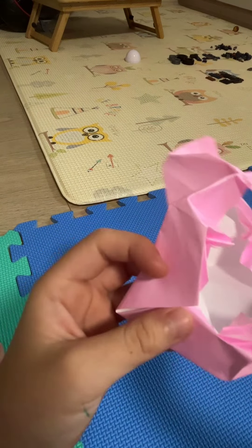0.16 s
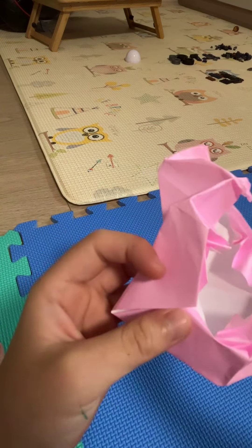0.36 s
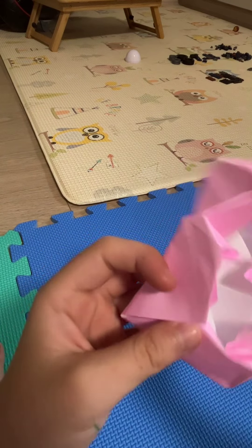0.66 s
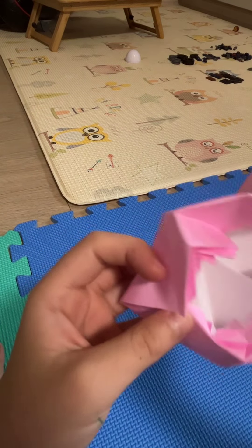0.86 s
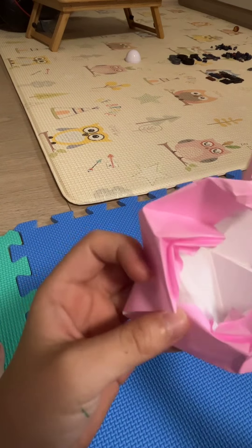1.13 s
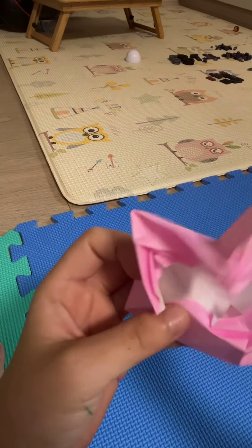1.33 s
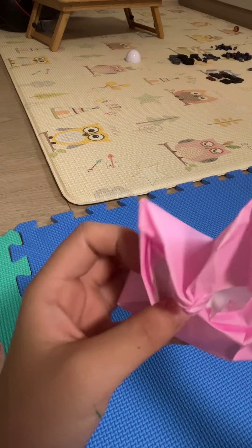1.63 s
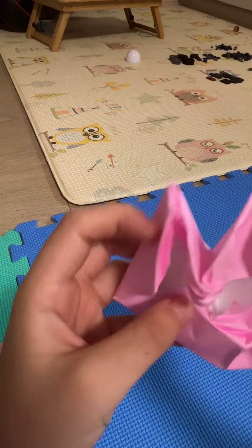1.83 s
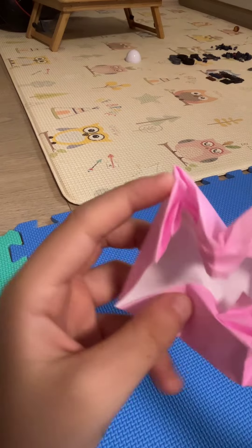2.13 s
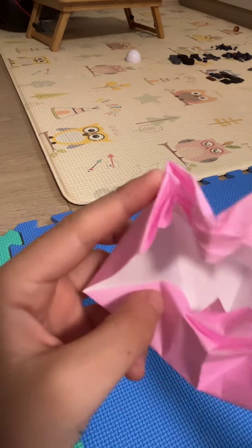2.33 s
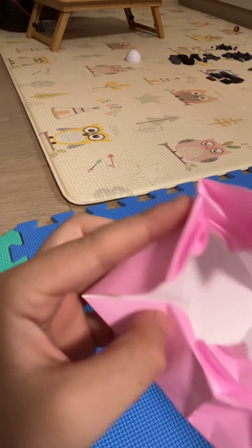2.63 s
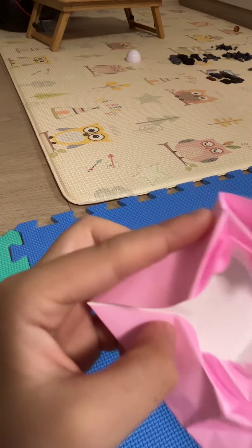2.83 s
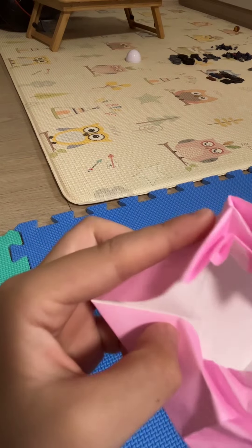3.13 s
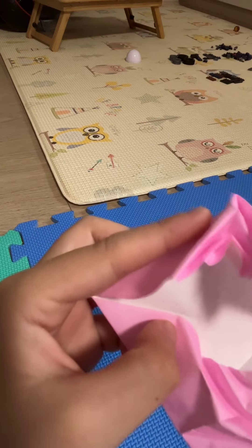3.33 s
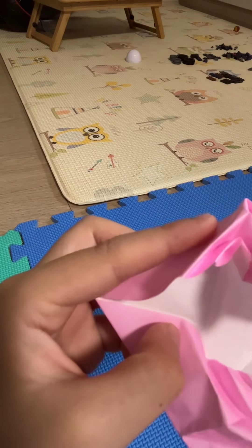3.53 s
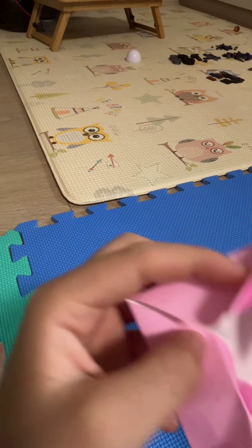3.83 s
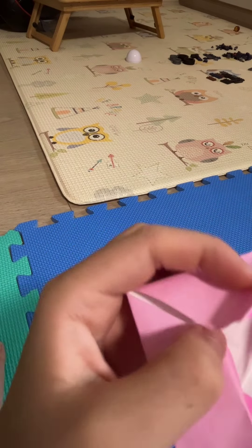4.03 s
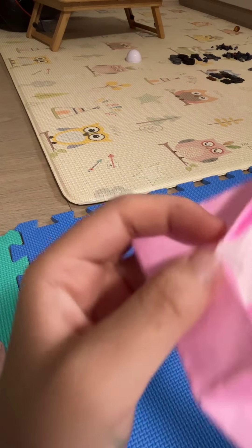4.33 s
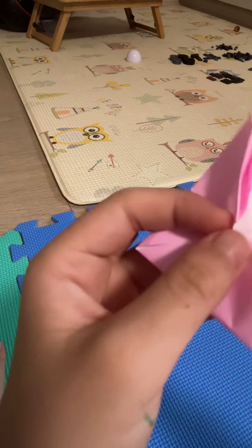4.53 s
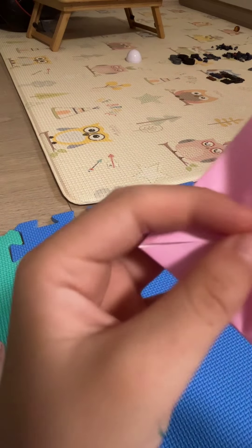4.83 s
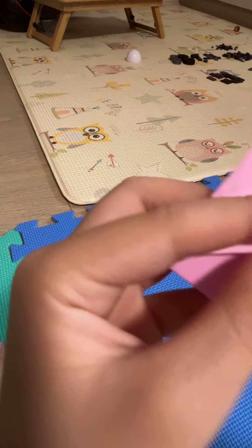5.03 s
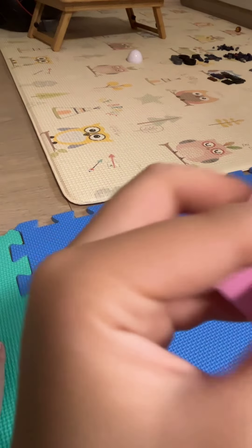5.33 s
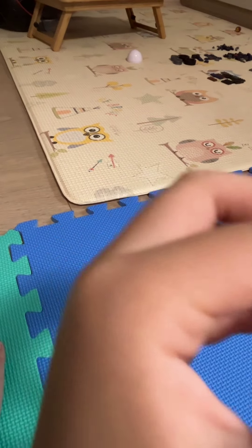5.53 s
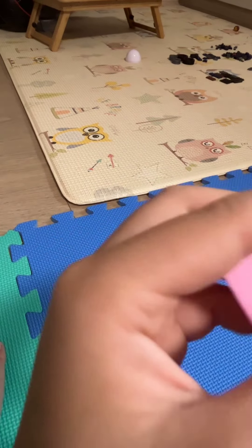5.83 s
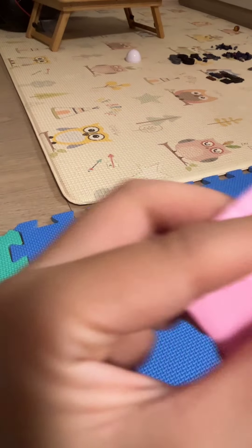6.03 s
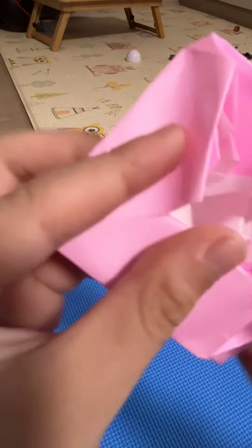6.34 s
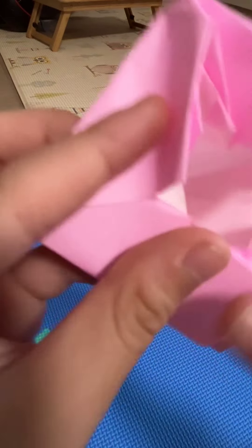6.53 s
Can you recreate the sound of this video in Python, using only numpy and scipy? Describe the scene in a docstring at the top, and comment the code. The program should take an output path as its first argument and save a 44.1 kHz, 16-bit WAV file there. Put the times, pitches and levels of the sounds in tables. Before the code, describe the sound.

Fingers flex and turn folded paper, giving irregular crackles, papery swishes and dull little thumps in a quiet indoor room.

```python
"""A low room hum and a soft rumble come first, with a faint paper rustle; then fingers fold a paper figure.
Hum, rumble and grip are coloured noise; the grip adds small ringing knocks.
Rustle is patchy hiss plus fibre clicks, shaped by a list of finger strokes.
Creases snap as short noise bursts in four bands; panels flap as short ringing tones that sag in pitch.
A faint room reply follows the paper, and the microphone trims both ends of the spectrum."""
import sys
import numpy as np
from scipy import signal
from scipy.fft import rfft, irfft, next_fast_len
from scipy.io import wavfile
from scipy.ndimage import uniform_filter1d, map_coordinates

SR = 44100
rng = np.random.default_rng(int(sys.argv[2]) if len(sys.argv) > 2 else 0)


def int16_out(signal):
    """Quantize to a 16-bit WAV file."""
    q = np.round(np.clip(np.atleast_2d(signal).T, -1, 1) * 32767)
    wavfile.write(sys.argv[1], SR, q.astype(np.int16))


N = 294134

# Spectral shape of the room hum: (frequency [Hz], relative level [dB])
HUM_SPECTRUM = [(59, -2.5), (100, -0.5), (547, -13), (1060, -22), (1760, -34), (10700, -44)]
# How the hands move, before stroke activity and wobble: (time [s], grip level [dB], rumble level [dB])
HAND_LEVELS = [(0, -72.5, -56.5), (1.4, -56, -59.5), (2.9, -54, -57), (3.4, -53.5, -51.5),
               (4.1, -56.5, -47.5), (4.6, -58.5, -63), (6.2, -67, -55), (6.67, -51, -68)]
# Spectral shape of the grip's flexing and bumping: (frequency [Hz], relative level [dB])
GRIP_SPECTRUM = [(60, 0), (150, -2), (500, -6), (2500, -32.5)]
# Spectral shape of the low rumble: (frequency [Hz], relative level [dB])
RUMBLE_SPECTRUM = [(22, -42), (50, 3), (110, -0.5), (200, -71)]
# Fingers sliding along paper: (time of full level [s], length [s], rustle level [dB])
STROKES = [(.01, 0.045, -54.5), (0.202, 0.12, -54.5), (0.661, 0.087, -45), (0.901, 0.13, -49.5),
           (1.198, 0.056, -56.5), (1.465, 0.071, -52.5), (1.542, 0.14, -55), (1.745, 0.2, -58),
           (1.852, 0.66, -51), (2.093, 0.23, -49), (2.485, 0.15, -46.5), (2.706, 0.28, -48.5),
           (3.038, 0.22, -54.5), (3.44, 0.068, -52), (3.559, 0.039, -45), (3.772, 0.13, -48.5),
           (3.91, 0.15, -46.5), (4.087, 0.077, -39), (4.249, 0.15, -47), (4.421, 0.15, -46.5),
           (4.776, 0.29, -51.5), (4.907, 0.15, -45), (5.123, .09, -56.5), (5.34, 0.21, -52),
           (5.453, 0.044, -43), (5.49, 0.27, -50.5), (5.834, 0.04, -43), (5.88, 0.15, -51.5),
           (5.982, 0.031, -36.5), (6.098, 0.11, -44), (6.267, 0.084, -50.5), (6.392, 0.15, -47.5),
           (6.507, 0.13, -51.5)]
# Spectral shape of skin on paper: (frequency [Hz], relative level [dB])
RUSTLE_SPECTRUM = [(500, -51), (1000, 1), (2500, -4), (5200, -3), (7000, -5), (9000, -6.5), (16000, -12)]
# Creases buckling: (time [s], level before band weighting [dB], brightest frequency [Hz])
CREASES = [(0.1515, -37.5, 6770), (0.2648, -32.5, 7700), (0.472, -41, 1950), (0.486, -40, 2830),
           (0.6758, -17.5, 4300), (0.8047, -38.5, 1350), (0.9025, -26, 5230), (1.1925, -42.5, 5570),
           (1.341, -36, 1190), (1.4238, -41.5, 5000), (1.4546, -33.5, 5000), (1.4616, -24.5, 4500),
           (1.4683, -19.5, 4400), (1.5521, -33, 5800), (1.56, -28.5, 1950), (1.5898, -39, 5840),
           (1.6184, -36, 4400), (1.6558, -35, 6930), (1.6738, -28, 5100), (1.703, -43.5, 5100),
           (2.1118, -24.5, 3370), (2.1568, -32.5, 7500), (2.284, -22.5, 3630), (2.3365, -40, 1770),
           (2.4877, -26.5, 1900), (2.5137, -34, 6700.0), (2.5331, -38, 5960), (2.594, -34, 3000),
           (2.606, -29, 4300), (2.6312, -44, 6400), (2.684, -44, 5370), (2.7941, -27, 2620),
           (2.8737, -30, 3120), (2.894, -30, 3320), (3.0362, -30.5, 1370), (3.302, -36.5, 1580),
           (3.3165, -30, 2700), (3.448, -26.0, 6940), (3.4827, -30, 2670), (3.502, -33.5, 3980),
           (3.565, -27, 5730), (3.5893, -22.5, 7000), (3.5956, -30, 6400), (3.747, -39, 4010),
           (3.8513, -26, 3030), (3.899, -26, 4370), (3.9187, -31, 6700), (3.9948, -33.5, 1630),
           (4.1108, -28, 4160), (4.1296, -27.5, 4300), (4.1391, -21.5, 2820), (4.236, -35.5, 6650),
           (4.257, -37.5, 7600), (4.341, -33.5, 6600), (4.358, -31.5, 5900), (4.655, -27.5, 3870),
           (4.824, -33.5, 6840), (4.843, -32, 6200), (4.948, -26.5, 3100), (4.9533, -21, 4000),
           (4.9984, -14.5, 7350), (5.037, -55.5, 2700), (5.052, -25.5, 2800), (5.1128, -37, 1700.0),
           (5.181, -31, 6200), (5.318, -21, 5040), (5.3831, -28, 3800), (5.527, -27.5, 4050),
           (5.6014, -35.5, 5300), (5.655, -34.5, 1490), (5.6942, -39.5, 5070), (5.738, -38.5, 7100),
           (5.84, -30, 7200), (5.851, -24, 3300), (5.9934, -28, 8140), (6.1216, -23.5, 3630),
           (6.169, -26.5, 4460), (6.2568, -32, 1300), (6.303, -28.5, 2550), (6.5216, -18, 5300),
           (6.616, -32, 2670)]
# Body, panel, crack and edge of a snap: (centre [Hz], width of one filter pass [Hz], decay by 60 dB [s])
SNAP_BANDS = [(644, 3830, 0.033), (2044, 3780, 0.0087), (5430, 5330, 0.0068), (10350, 7300, 0.0027)]
# Panels flipping over: (time [s], level before the 5 dB lift [dB], pitch before drop and sag [Hz])
PANEL_FLIPS = [(0.486, -40.5, 610), (0.905, -41, 664), (1.374, -42, 482), (1.466, -28.5, 328),
               (1.56, -30, 522), (1.859, -34.5, 370), (2.177, -33.5, 184), (2.338, -32.5, 520),
               (2.597, -33, 307), (2.895, -28.5, 444), (2.965, -36, 343), (3.038, -25, 168),
               (3.08, -38.5, 405), (3.316, -34, 670), (3.449, -35.5, 150), (3.483, -32, 578),
               (3.567, -39, 330), (3.592, -28.5, 345), (4.001, -29.5, 358), (4.143, -33.5, 137),
               (4.658, -34, 330), (4.95, -29.5, 420), (5.051, -24.5, 273), (5.071, -31, 227.7),
               (5.115, -32.5, 255), (5.385, -28, 242), (5.464, -38, 196), (6.123, -30, 448),
               (6.523, -29.5, 459), (6.615, -37.5, 198)]
# How fast the room dies away: (frequency [Hz], decay by 60 dB [s])
ROOM_DECAY = [(200, 0.16), (3000, 0.52), (14000, 0.0083)]

# A stroke catches quickly and stops short
ATTACK_S, RELEASE_DB_PER_S = 0.012, 724.5
# The paper then settles, weaker and slower, to a resting whisper
SETTLE_DB, SETTLE_DB_PER_S, REST_DB = -18, 98, -70.5
# Strokes shorter than FLICK_S are nail flicks on an edge: the briefer, the less body below FULL_BELOW_HZ
FLICK_S, FLICK_THIN_DB, FULL_BELOW_HZ = 0.081, 25, 2700
CRACKLE_PER_FULL = 0.31  # extra crackle per dB of body lost [dB]
ACCENT_DB, ACCENT_OCTAVES = 6, 0.089  # each crease rings out around its brightest pitch
# A flap starts sharper by DROP times its pitch, as fast bending waves come first, and sinks over DROP_S
DROP, DROP_S = 1.2, 0.0013
TOP_HZ = 16500  # the microphone passes nothing above


def amp(db):
    """Decibels to a linear factor."""
    return 10 ** (np.asarray(db) / 20)


def unit(x):
    """x scaled to rms 1."""
    return x / np.sqrt(np.mean(x ** 2) + 1e-20)


def along(points, hz):
    """Read (Hz, value) points on a log frequency axis."""
    f, v = np.transpose(points)
    return np.interp(np.log(hz + 1), np.log(f + 1), v)


def curves(rows):
    """One value per sample for each column after the time."""
    s, *cols = np.transpose(rows)
    return [np.interp(np.arange(N) / SR, s, c) for c in cols]


def wobble(rate):
    """A smooth random curve, rate knots a second."""
    knots = rng.standard_normal(int(N * rate / SR) + 4)
    return map_coordinates(knots, [np.arange(N) * rate / SR])


def filtered(x, response):
    """x times a complex response of frequency."""
    m = next_fast_len(N + SR // 2)
    hz = np.fft.rfftfreq(m, 1 / SR)
    return irfft(rfft(x, m) * response(hz), m)[..., :N]


def coloured(x, spectrum):
    """x given a spectrum, at rms 1."""
    return unit(filtered(x, lambda hz: amp(along(spectrum, hz))))


def resonance(centre_hz, width_hz):
    """A steep causal band: one resonance passed three times."""
    return lambda f: (1j * f * width_hz / (centre_hz ** 2 - f * f + 1j * f * width_hz)) ** 3


def placed(times, rows):
    """Short sounds, one per row, summed at their times."""
    first = np.round(np.asarray(times) * SR).astype(int)[:, None]
    at = first + np.arange(rows.shape[1])
    return np.bincount(at.ravel(), rows.ravel(), N + SR)[:N]


def grains(count, low_hz, high_hz, turns, spread_db, clump):
    """Clumped tiny knocks of scattered level, each ringing down 60 dB in a set number of turns."""
    place, rank, tone = rng.random((count, 3)).T[:, :, None]
    odds = np.cumsum(amp(clump * wobble(18)))  # grains gather where the wobble is high
    when = np.searchsorted(odds, place[:, 0] * odds[-1]) / SR
    hz = low_hz * (high_hz / low_hz) ** tone
    t = np.arange(int(8 * SR / low_hz)) / SR
    noise = rng.standard_normal((count, len(t)))
    ring = np.sin(2 * np.pi * hz * t) + 1.45 * noise
    decay = amp(-60 * hz * t / turns)
    rows = ring * decay * np.sqrt(hz)
    level_db = -spread_db * np.log(rank + 0.04)  # a few loud, many small; the offset caps the loudest
    return placed(when, amp(level_db) * rows)


def hum():
    """The faint air of the room: coloured noise whose level drifts slowly."""
    level_db = -56.0 + 2.8 * wobble(2.84)
    return amp(level_db) * coloured(rng.standard_normal(N), HUM_SPECTRUM)


def grip(slide_db):
    """The grip flexes and bumps the figure dully, more while fingers slide; moving hands stir a low rumble."""
    grip_db, rumble_db = curves(HAND_LEVELS)
    knocks = grains(count=220, low_hz=168.2, high_hz=815, turns=7.2, spread_db=6.0, clump=4)
    bumps = coloured(knocks, GRIP_SPECTRUM)
    flex = coloured(rng.standard_normal(N) * amp(3 * wobble(35)), GRIP_SPECTRUM)
    busy_db = 0.9 * (slide_db - slide_db.mean())
    lumps_db = 2.2 * wobble(12)
    rumble = coloured(rng.standard_normal(N), RUMBLE_SPECTRUM)
    return amp(grip_db + busy_db) * (flex + 0.8 * bumps) + amp(rumble_db + lumps_db) * rumble


def sliding():
    """Level and fullness of the rustle in dB: each stroke rises, holds, stops and settles; their powers add."""
    start, length, db = np.transpose(STROKES)[:, :, None]
    full_db = -FLICK_THIN_DB * np.clip(1 - length / FLICK_S, 0, 1)
    t = np.arange(0, N / SR + 0.002, 0.001)
    rise = np.clip((t - start) / ATTACK_S + 1, 0, 1) ** 2  # begins ATTACK_S ahead of start
    after = np.clip(t - start - length, 0, None)
    stop = amp(-RELEASE_DB_PER_S * after)
    settle = amp(SETTLE_DB - SETTLE_DB_PER_S * after)
    powers = (amp(db) * rise * (stop + settle)) ** 2
    power = powers.sum(axis=0) + amp(REST_DB) ** 2
    mean_full_db = (powers * full_db).sum(axis=0) / power  # the louder stroke decides
    return curves(np.transpose([t, 10 * np.log10(power), mean_full_db]))


def crackle():
    """Fibres and paper edges tick, mostly in the treble."""
    ticks = grains(count=1500, low_hz=2453, high_hz=14800, turns=86, spread_db=6.0, clump=6.0)
    return unit(filtered(ticks, lambda hz: 1j * hz / (2000 + 1j * hz)))


def smooth_field(shape, bins, frames):
    """A random time-frequency pattern, blurred over bins and frames, at rms 1."""
    across = uniform_filter1d(rng.standard_normal(shape), size=bins, axis=0)
    return unit(uniform_filter1d(across, size=frames, axis=1))


def rustle(slide_db, full_db):
    """Skin slides on paper: patchy, stuttering hiss holds narrow colours for a while, with fibre clicks on it."""
    stutter_db = 2.6 * wobble(45) + 3.2 * wobble(140)
    z = signal.stft(rng.standard_normal(N), nperseg=256)[2]
    patches = smooth_field(z.shape, bins=9, frames=16)
    colours = smooth_field(z.shape, bins=3, frames=70)
    hiss = signal.istft(z * amp(2.5 * patches + 3.2 * colours), nperseg=256)[1][:N]
    crackle_db = 4.0 - CRACKLE_PER_FULL * full_db
    grain = unit(hiss * amp(stutter_db)) + amp(crackle_db) * crackle()
    rub = coloured(grain, RUSTLE_SPECTRUM)
    body = filtered(rub, lambda hz: 1 / (1 + (hz / FULL_BELOW_HZ) ** 4))
    return amp(slide_db) * (rub - body + amp(full_db) * body)


def snaps():
    """A crease lets go: a burst of bending waves whose treble dies first."""
    s, level_db, bright_hz = np.transpose(CREASES)
    t = np.arange(1024) / SR
    # small creases excite the high bands, large ones the low: each falls off with octaves from the brightest
    band_db = [level_db - 4 * np.log2(hz / bright_hz) ** 2 for hz, _, _ in SNAP_BANDS[1:]]
    body_db = band_db[0] - 3  # the whole figure knocks along with the panel
    f = np.fft.rfftfreq(len(t), 1 / SR)
    octaves = np.log2((f + 1) / bright_hz[:, None])
    accent_db = ACCENT_DB * np.exp(-(octaves / ACCENT_OCTAVES) ** 2)
    attack = (1 - np.exp(-t / 0.001)) ** 2
    out = 0
    for (hz, width, t60), db in zip(SNAP_BANDS, [body_db, *band_db]):
        # each crease has its own uneven colour
        scatter = rng.standard_normal((len(s), len(t) // 2 + 1))
        uneven_db = 14 * uniform_filter1d(scatter, size=14, axis=1)
        noise = rng.standard_normal((len(s), len(t)))
        burst = irfft(rfft(noise) * amp(uneven_db + accent_db))
        burst *= attack * amp(-60 * t / t60)
        burst = irfft(rfft(burst) * resonance(hz, width)(f))
        # equal energy: as much as rms 1 held for 2 ms
        burst *= np.sqrt(0.002 * SR) / np.linalg.norm(burst, axis=1, keepdims=True)
        out = out + placed(s, burst * amp(db)[:, None])
    return out


def flaps():
    """A whole panel flips over and the hollow figure rings for a few cycles, sagging in pitch."""
    s, db, hz = np.transpose(PANEL_FLIPS)[:, :, None]
    t = np.arange(SR // 12) / SR
    sag = t * (1 - 2.2 * t)
    early_drop = DROP * DROP_S * (1 - np.exp(-t / DROP_S))
    cycles = hz * (sag + early_drop)
    fundamental = np.sin(2 * np.pi * cycles)
    overtone = 0.82 * np.sin(2 * np.pi * (1.78 * cycles + rng.random(s.shape))) * amp(-60 * t / 0.024)
    push = 0.58 * np.sin(2 * np.pi * 0.45 * cycles)  # the air shoved aside
    swing = (1 - np.exp(-t / 0.00055)) * amp(-60 * t / 0.049)
    return placed(s[:, 0], amp(db + 5) * swing * (fundamental + overtone + push))


def room(x):
    """Each frequency of the room's answer dies at its own speed; eight noise tails take turns."""
    hz, t, z = signal.stft(rng.standard_normal((8, SR // 4)), SR, nperseg=256)
    decay = amp(-60 * t / along(ROOM_DECAY, hz)[:, None])
    tails = signal.istft(z * decay, SR, nperseg=256)[1]
    # every 2048 samples the sound feeds the next tail
    turn = np.arange(N) // 2048 % len(tails) == np.arange(len(tails))[:, None]
    wet = signal.fftconvolve(x * turn, tails / np.linalg.norm(tails[0]), axes=1).sum(axis=0)
    return np.pad(wet, (130, 0))[:N]  # the answer arrives about 3 ms late


def scene():
    """Paper and its faint room answer, over the grip and the hum."""
    slide_db, full_db = sliding()
    paper = snaps() + flaps() + rustle(slide_db, full_db)
    return (paper + amp(-22) * room(paper) + grip(slide_db) + hum())[None]


def record(dry):
    """The microphone drops the deepest bass, dips around 4300 Hz and fades out up to its band limit."""
    bass = lambda hz: (1j * hz / (38 + 1j * hz)) ** 2
    dip = lambda hz: 1 - 0.5 * np.exp(-((hz - 4300) / 350) ** 2)
    limit = lambda hz: np.clip((TOP_HZ - hz) / 700, 0, 1) ** 2
    return filtered(dry, lambda hz: bass(hz) * dip(hz) * limit(hz))


dry = scene()
out = record(dry)
int16_out(out)
```